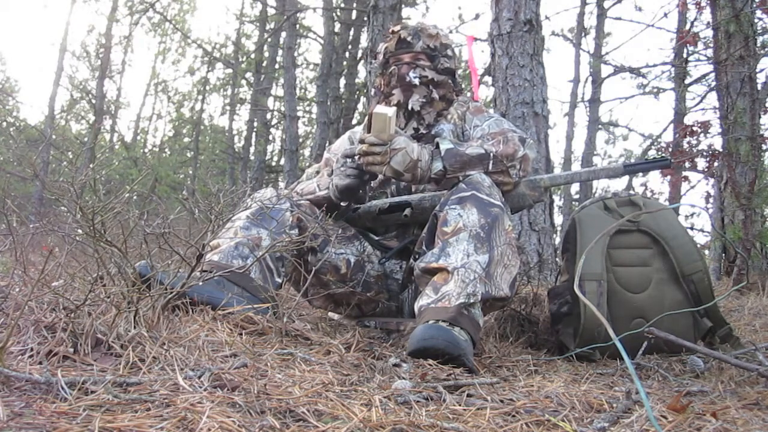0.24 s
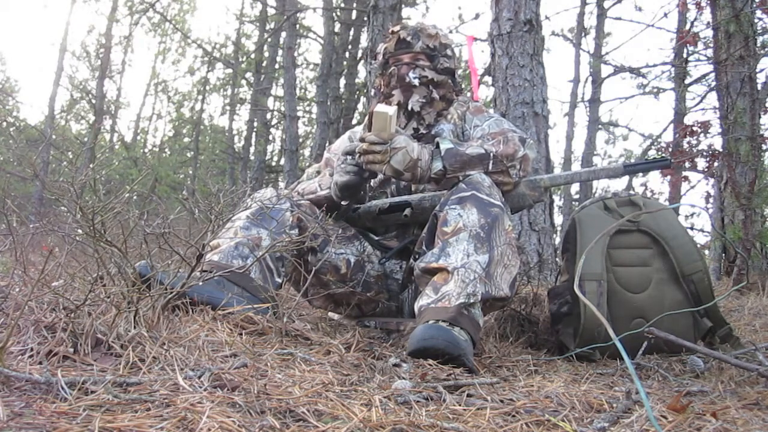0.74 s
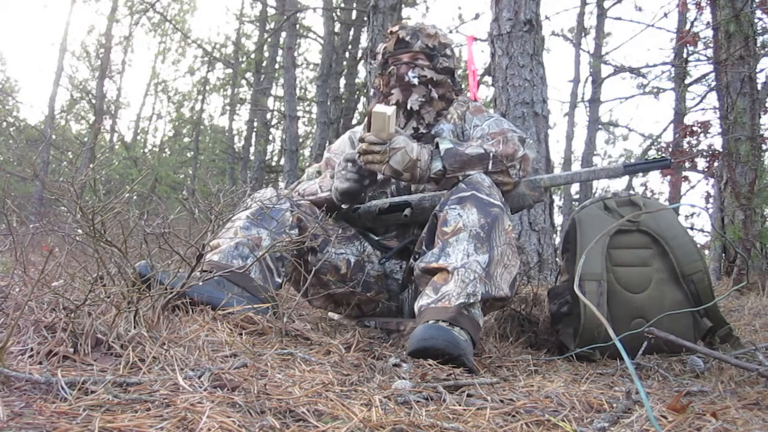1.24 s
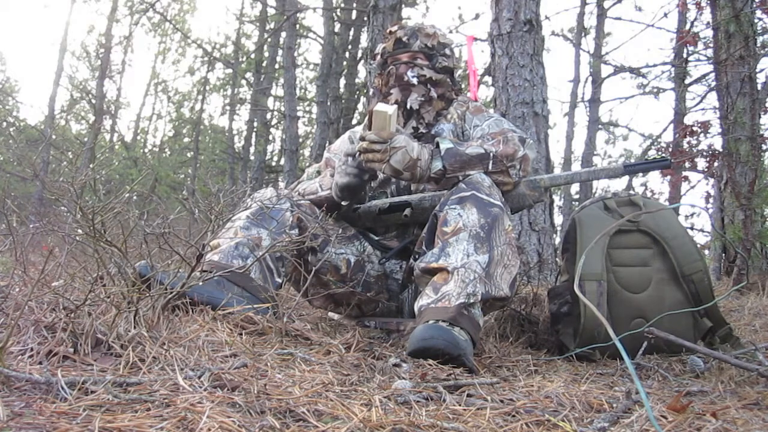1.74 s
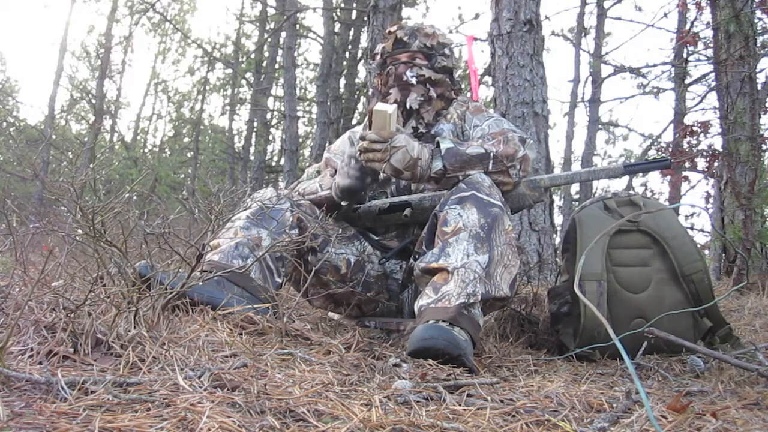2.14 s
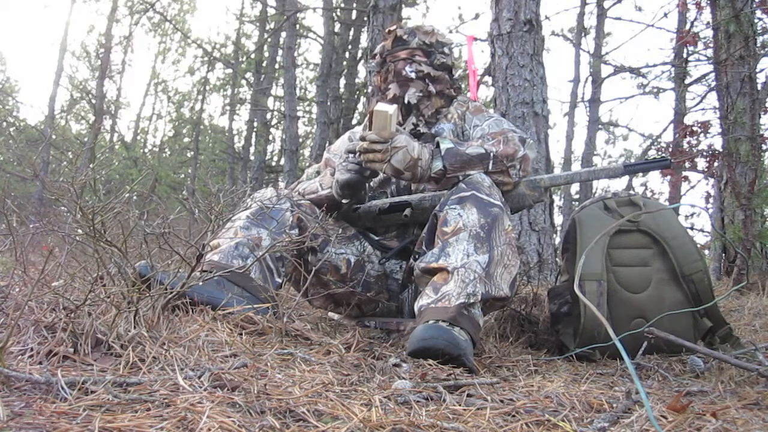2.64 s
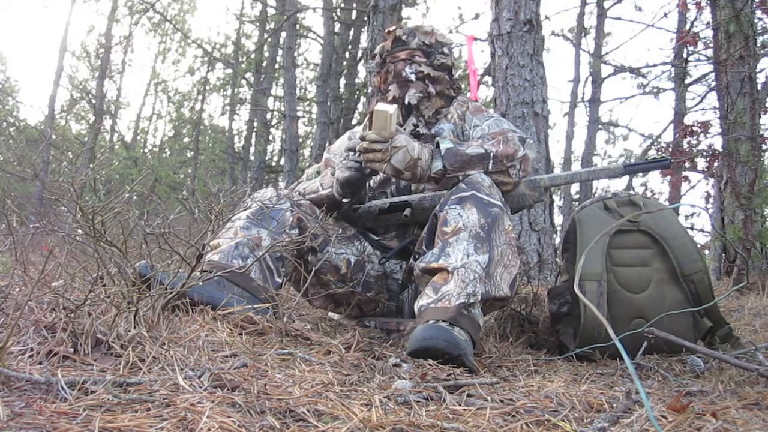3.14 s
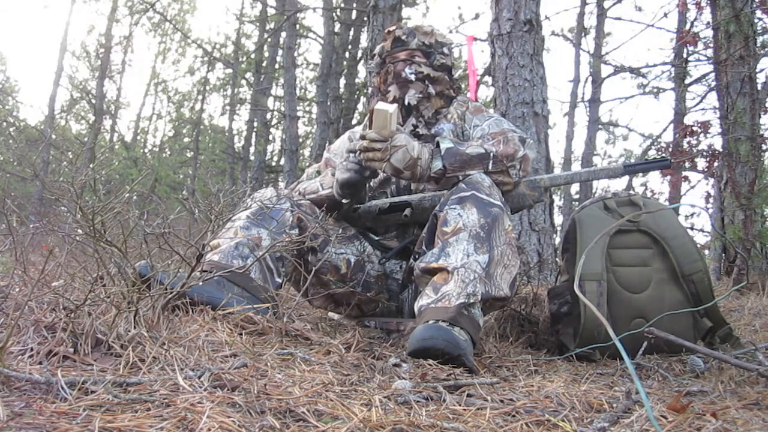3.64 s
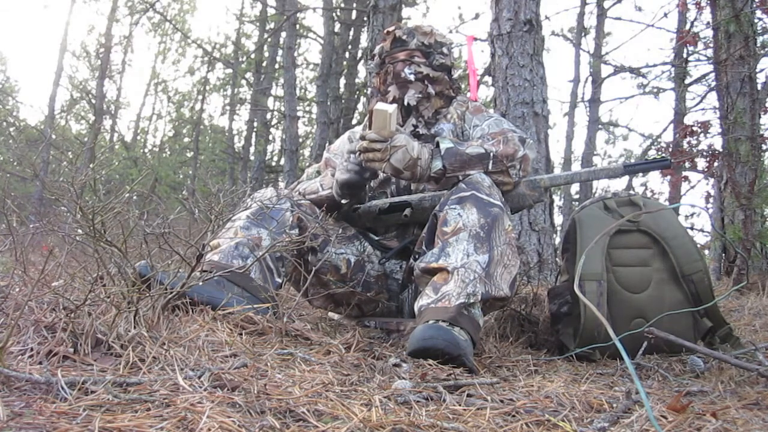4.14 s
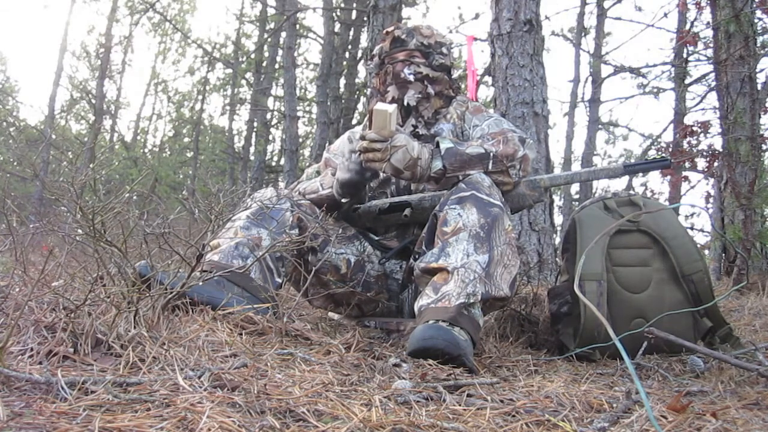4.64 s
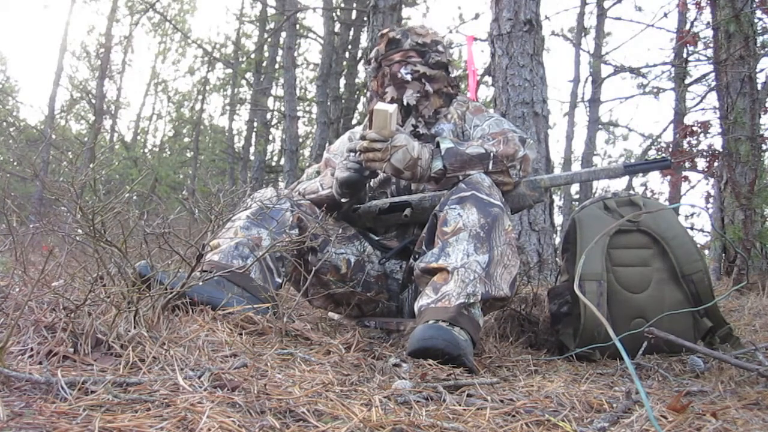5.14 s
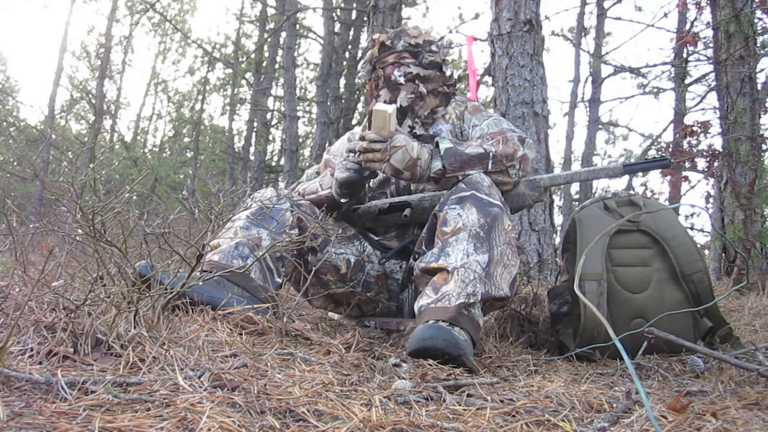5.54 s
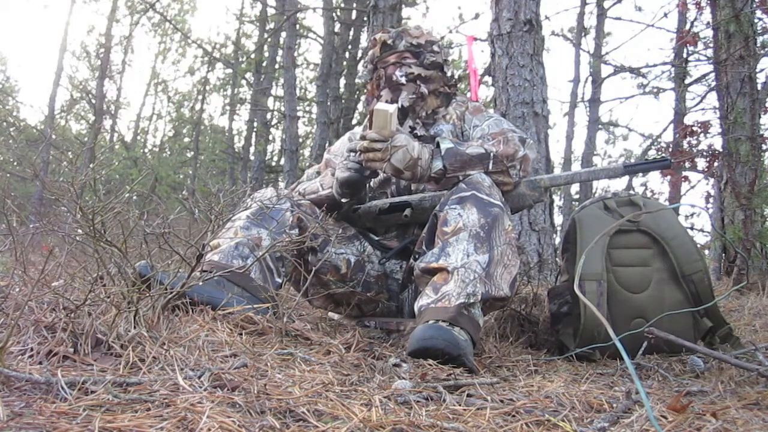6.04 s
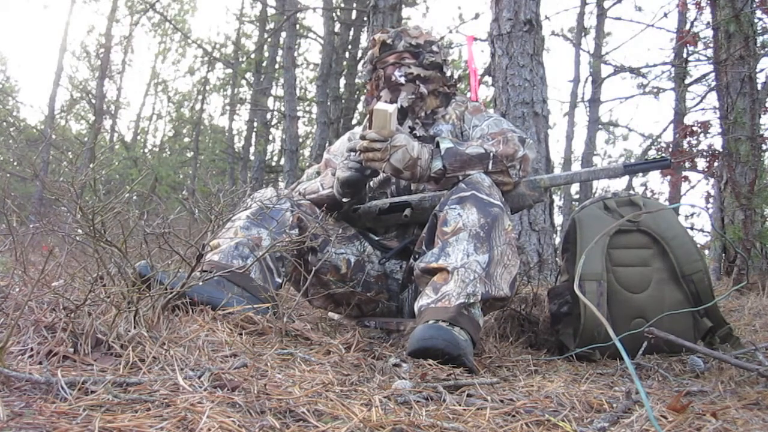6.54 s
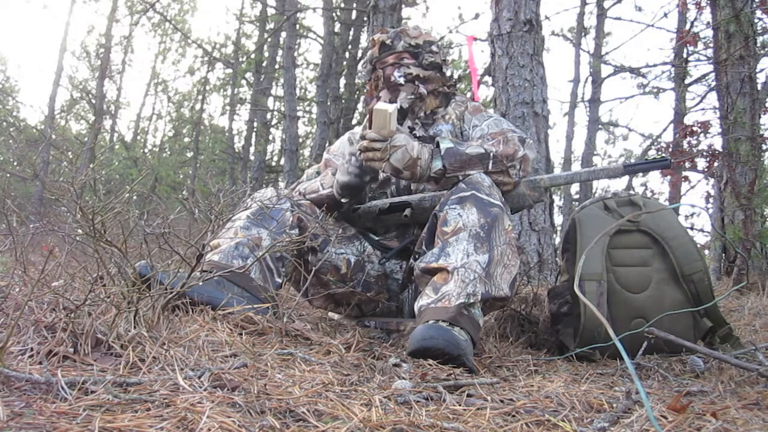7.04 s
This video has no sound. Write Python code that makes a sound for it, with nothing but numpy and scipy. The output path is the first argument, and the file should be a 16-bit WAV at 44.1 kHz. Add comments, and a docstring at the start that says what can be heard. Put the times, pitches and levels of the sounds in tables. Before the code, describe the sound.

A soft, steady hiss with a faint high whine is heard throughout in quiet woods. Well above it, a hand-worked wooden box call makes very short turkey yelps, each a hollow, scraping squeak that falls in pitch and leaves a brief echo among the trunks. A single note sounds at about 0.4 seconds. From 1.0 to 2.2 seconds comes a run of six yelps, about four a second, starting clean and turning raspy. After a pause of a second, a run of seven follows from 3.3 to 4.7 seconds at a similar pace, rougher in the middle and cleaner at either end. Only the background remains until three slower notes come at about 6.2, 6.7 and 7.1 seconds, the last one raspier. The yelps are all about equally loud.

```python
"""A box call in pine woods

A wooden box call is worked in short strokes: a single note, two runs of yelps, three slow ones.
Stick-slip friction drives each stroke: the lid slips on the rail some 200 times a second, exciting the
modes of the hollow box, and squeals at a falling pitch. The trunks scatter a brief echo.
A soft hiss and a faint high whine are heard throughout."""
import sys
import numpy as np
from scipy import signal
from scipy.fft import rfft, irfft
from scipy.io import wavfile

SR = 44100
rng = np.random.default_rng(int(sys.argv[2]) if len(sys.argv) > 2 else 0)


def dump_mix(stems):
    """Bounce the given channels to the path in sys.argv[1] as a 16-bit WAV at rate SR."""
    frames = np.atleast_2d(stems).T  # one column per channel
    limited = np.clip(frames, -1, 1)  # hard clip at full scale
    pcm = np.round(limited * 32767).astype(np.int16)
    wavfile.write(sys.argv[1], SR, pcm)


N = 322371

# spectrum of the hiss: f/Hz, spectral density level/dB (in 1 Hz)
HISS_SPECTRUM = [(25, -86), (70, -84), (150, -84.5), (400, -87.5), (1000, -88), (1600, -86), (2100, -91.5),
                 (2800, -91), (4200, -97.5), (6500, -100), (8500, -102.5), (11000, -102.5), (14000, -109),
                 (16000, -110)]
# narrow noise bands of the whine: f/Hz, nominal bandwidth/Hz, rms level/dB
WHINE_BANDS = [(1217, 42, -59.5), (1500, 36, -62.5), (1745, 84, -61.5), (2422, 19, -68), (2762, 43, -63),
               (5420, 27, -75), (5640, 30, -66.5), (6200, 32, -68), (6330, 34, -74.5), (6920, 330, -71),
               (7800, 25, -80.5), (9630, 40, -108), (10160, 50, -74), (10450, 31, -79.5)]
# strokes of the lid: t/s, length/s, level/dB, mid-stroke squeal f/Hz, sag (share of f lost), treble/dB
LID_STROKES = [(0.3854, 0.039, -21, 674, 0.11, -12.5), (1.0237, 0.064, -18.5, 741, .09, 2),
               (1.237, 0.027, -21.5, 656, .12, -1.5), (1.417, 0.055, -18.5, 712.7, .11, 1.5),
               (1.659, 0.048, -18.5, 643.3, .13, 1), (1.918, 0.036, -19.5, 634.4, .09, 0.5),
               (2.179, 0.042, -18.5, 645.6, .12, 1), (3.307, 0.054, -18.5, 757, .19, -3),
               (3.515, 0.044, -20, 711, .11, 1), (3.722, 0.048, -19.5, 711, .06, 2),
               (3.953, 0.043, -18.9, 651, .11, 1), (4.206, 0.048, -19, 661.5, 0.084, 2),
               (4.448, 0.053, -18.5, 746, .15, 5), (4.694, 0.049, -18.5, 723.6, 0.16, 2),
               (6.158, 0.053, -19, 740, .02, -0.5), (6.7214, 0.039, -20, 721, 0.088, 2),
               (7.092, 0.04, -19.5, 658.5, 0.079, -1)]
# normal modes of the box: f/Hz, bandwidth/Hz, relative level/dB
BOX_MODES = [(566, 13.5, -8), (612.6, 19.5, -4.5), (1027.5, 118.5, 7), (1184, 110, 2.5), (1424, 180, 1.5),
             (1684, 136, 3.5), (1910, 180, -4.5), (2236, 80, 1.5), (2552, 80, -2), (2910, 357, -9.5),
             (3320, 198, -8), (4350, 210, -18.5), (4750, 300, -17.5), (5073, 232, -9), (5330, 390, -9.5),
             (5800, 1230, -24.5), (6440, 400, -24), (7800, 2100, -21.5), (8670, 1200, -21),
             (10200, 390, -35), (11410, 360, -28.5), (12800, 1800, -43)]
# harmonics of the squeal, from the second upward: relative level/dB
SQUEAL_HARMONICS = [3, -3.5, -16.5, -27, -18.5, -13, -22.5]
# echo among the trunks: f/Hz, relative level/dB, reverberation time of the main decay/s
ECHO_BANDS = [(400, -39, 0.15), (700, -21, 0.074), (1320, -29.5, 0.12), (2710, -13.5, 0.085),
              (3400, -18, 0.26), (3980, -38, 0.13), (5040, -25, 0.11), (14000, -18, 0.17)]
# resonant peaks in the echo: f/Hz, bandwidth/Hz, boost/dB
ECHO_PEAKS = [(1262, 120, 17), (2470, 250, 8.5), (2900, 220, 8), (4160, 670, 13.5)]

RELEASE_LEAD_S, RELEASE_ROUND_S, RELEASE_DB_PER_S = .004, .0045, 1597
RELEASE_HZ, RELEASE_SLOWING_POWER = 523, 3.4
CLEAN_HZ, RASPY_HZ, CYCLES_PER_SLIP = 736, 630.6, 3
TREBLE_PRESSED_DB, TREBLE_START_DIP_DB, TREBLE_OPEN_S, TREBLE_RELEASE_DIP_DB = 4.5, 8, .0038, 18.5


def from_db(db):
    """Amplitude ratio: a factor of ten for every 20 dB."""
    return 10 ** (np.asarray(db) / 20)


def rms_one(x):
    """Normalisation to unit root-mean-square amplitude."""
    return x / np.sqrt(np.mean(x ** 2) + 1e-20)


def cut(x, hz, kind, order=2):
    """Butterworth filtering, maximally flat in the passband."""
    return signal.sosfilt(signal.butter(order, hz, kind, fs=SR, output="sos"), x)


def resonance(x, hz, width):
    """Forced response of a damped oscillator, with unit gain at its peak."""
    r = np.exp(-np.pi * width / SR)
    feedback = [1, -2 * r * np.cos(2 * np.pi * hz / SR), r * r]
    return signal.lfilter(np.array([1, 0, -1]) * (1 - r * r) / 2, feedback, x)


def wander(size, hz):
    """Smooth random fluctuation: low-passed noise of unit rms."""
    return rms_one(cut(rng.standard_normal(2 * size), hz, "low")[size:])


def background():
    """Spectrally shaped noise: a broad band is heard as hiss, narrow bands as hollow tones and a whine."""
    hz, db = np.transpose(HISS_SPECTRUM)
    bins = np.maximum(np.fft.rfftfreq(N, 1 / SR), 1)
    gain = from_db(np.interp(np.log(bins), np.log(hz), db)) * np.sqrt(SR / 2)
    hiss = irfft(rfft(rng.standard_normal(N)) * gain, N)
    whine = 0
    for centre, width, level in WHINE_BANDS:
        band = resonance(rng.standard_normal(N), centre, 2 * width)
        whine += from_db(level) * rms_one(resonance(band, centre, 2 * width))
    return hiss + whine


def hand(t, length, pitch_hz, sag):
    """Relative pressure and squeal f/Hz: pitch falls as the lid slows, and sinks further on release."""
    released_s = RELEASE_ROUND_S * np.logaddexp(0, (t - length + RELEASE_LEAD_S) / RELEASE_ROUND_S)
    pressure = from_db(-RELEASE_DB_PER_S * released_s)
    pressed_hz = pitch_hz * (1 - sag * (t / length - .5))
    return pressure, pressed_hz + (RELEASE_HZ - pressed_hz) * (1 - pressure) ** RELEASE_SLOWING_POWER


def chatter(slips, rebound, rebound_s, kick_spread_db=1.2, edge_spread_db=4.5, scrape_s=.0032):
    """Stick-slip force (kick, rebound and dying scrape at each slip) and the time since the last slip."""
    size = len(slips)
    count = np.maximum.accumulate(slips.astype(int))
    strength, edge = rng.standard_normal((64, 2))[count % 64].T
    kicks = np.diff(count, prepend=-1) > 0
    age = np.arange(size) - np.maximum.accumulate(kicks * np.arange(size))
    since_slip = age / SR
    rebounds = np.diff(1.0 * (since_slip > rebound_s), prepend=0).clip(0)
    # successive slips cross much the same wood grain, so part of the scrape repeats
    grain = .085 * rng.standard_normal(size)[age]
    scrape = (grain + .11 * rng.standard_normal(size)) * np.exp(-since_slip / scrape_s)
    force = kicks + rebound * rebounds + cut(scrape, 2190, "high")
    # some slips let go more sharply than others
    force += (from_db(edge_spread_db * edge - 3) - 1) * cut(force, 4400, "high", order=1)
    return from_db(kick_spread_db * strength) * force, since_slip


def box(force, low_mode_db):
    """Modal superposition: the point of contact sets how strongly the low modes of the box are driven."""
    ring = 0
    for k, (hz, width, db) in enumerate(BOX_MODES):
        is_low = hz < 1120
        ring += (-1) ** k * from_db(db + low_mode_db * is_low) * resonance(force, hz, width)
    return rms_one(cut(ring, 572, "high", order=6))  # a small box radiates no bass


def squeal(t, cycles, since_slip, pressure, build_s=.0022, throb_s=.0025):
    """Self-excited oscillation of the lid: overtones that swell at each slip, and a slower-fading hum."""
    swell = 1 - np.exp(-t / build_s)
    flutter = from_db(2.2 * wander(len(t), 130))
    throb = 1 + .99 * np.exp(-since_slip / throb_s)
    harmonics = sum(from_db(db) * np.sin(2 * np.pi * (k * cycles + rng.random()))
                    for k, db in enumerate(SQUEAL_HARMONICS, 2))
    overtones = rms_one(swell * pressure ** .97 * flutter * throb * harmonics)
    fundamental = swell * pressure ** .68 * np.sin(2 * np.pi * cycles)
    return cut(overtones, 480, "high", order=4), rms_one(cut(fundamental, 526, "high", order=5))


def stroke(length, pitch_hz, sag, treble_db):
    """Frictional excitation in one push of the lid: chatter and squeal fall and darken together."""
    size = int(.13 * SR)
    t = np.arange(size) / SR
    pressure, squeal_hz = hand(t, length, pitch_hz, sag)
    # a brisk stroke squeals cleanly; a slow one, or one that slows sharply, breaks into rasp
    rasp = np.clip((CLEAN_HZ - pitch_hz) / (CLEAN_HZ - RASPY_HZ), 0, 1)
    squeal_db = np.interp(rasp, [0, 1], [-.5, -12]) - 30 * sag
    jitter = np.interp(rasp, [0, 1], [.018, .045]) + .2 * sag
    low_mode_db = np.interp(rasp, [0, 1], [-3, 1.5])
    cycles = np.cumsum(squeal_hz * (1 + .33 * jitter * wander(size, 220))) / SR
    # the slips are phase-locked to the squeal, with some play in their timing
    play = jitter * wander(size, 150)
    slips = cycles / CYCLES_PER_SLIP + play - play[0]
    rebound = np.interp(t, [0, length], [.25, .6])
    force, since_slip = chatter(slips, rebound, rebound_s=1.5 / pitch_hz)
    knock = box(pressure ** 1.1 * force, low_mode_db)  # the lid stops biting before its tone has died
    overtones, hum = squeal(t, cycles, since_slip, pressure)
    note = rms_one(knock + from_db(squeal_db + 3) * overtones)
    note += from_db(-13.5 + .23 * squeal_db) * hum
    # the treble opens as the lid bites and fades first as the hand eases off
    dip_db = TREBLE_START_DIP_DB * np.exp(-t / TREBLE_OPEN_S) + TREBLE_RELEASE_DIP_DB * (1 - pressure)
    treble = from_db(treble_db + TREBLE_PRESSED_DB - dip_db)
    note += (treble - 1) * cut(note, 4200, "high", order=1)
    return rms_one(note) * np.sqrt(length * SR / size)


def box_call():
    """Linear superposition of the strokes, each at its own time and level."""
    call = np.zeros(N + SR)
    for start, length, db, pitch_hz, sag, treble_db in LID_STROKES:
        note = from_db(db) * stroke(length, pitch_hz, sag, treble_db)
        at = int(start * SR)
        call[at:at + len(note)] += note
    return call[:N]


def woods(call):
    """Scattering from ground and trunks: a dense echo that decays at its own rate in each band."""
    t = np.arange(SR) / SR
    hz, levels, t60s = np.transpose(ECHO_BANDS)
    edges = np.geomspace(350, 16000, 12)
    faint_tail = from_db(-23) * np.exp(-t / .11)
    echo = 0
    for low, high in zip(edges, edges[1:]):
        log_centre = np.log(low * high) / 2
        level = np.interp(log_centre, np.log(hz), levels)
        t60 = np.interp(log_centre, np.log(hz), t60s)
        decay = (from_db(-60 * t / t60) + faint_tail) * (t > .006)
        band = cut(rng.standard_normal(SR), [low, high], "band")
        echo += from_db(level) * band * decay / np.linalg.norm(decay)
    rings = sum((from_db(db) - 1) * resonance(echo, f, width) for f, width, db in ECHO_PEAKS)
    return signal.fftconvolve(call, echo + rings)[:N]


def scene():
    """Sound pressures add: direct call, echo and background in one channel."""
    call = box_call()
    return (call + woods(call) + background())[None]


def record(dry, cutoff_hz=16300):
    """Band limiting by a steep elliptic low-pass filter."""
    return signal.sosfilt(signal.ellip(10, .1, 80, cutoff_hz, fs=SR, output="sos"), dry)


dry = scene()
out = record(dry)
dump_mix(out)
```